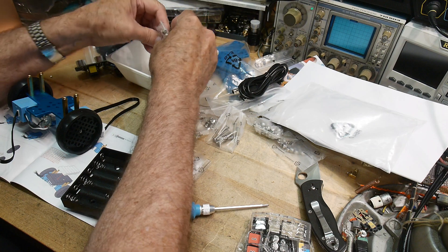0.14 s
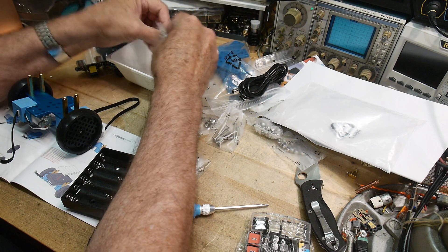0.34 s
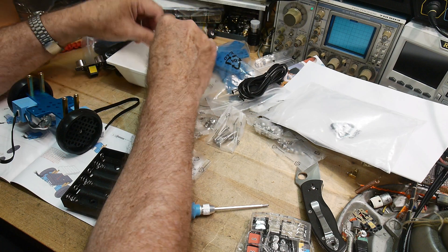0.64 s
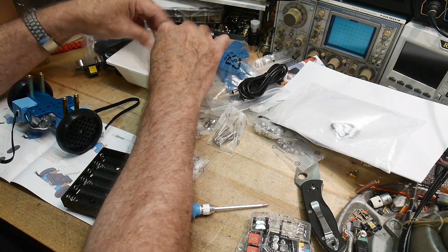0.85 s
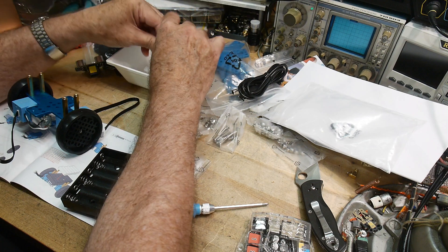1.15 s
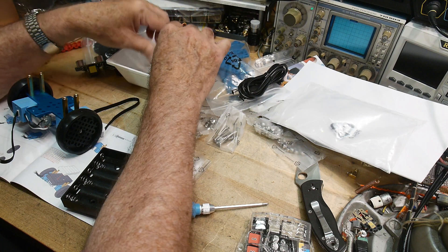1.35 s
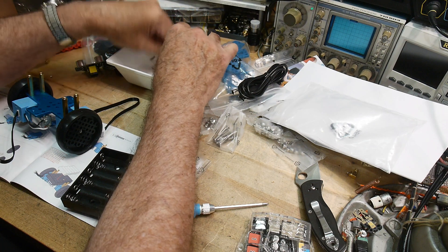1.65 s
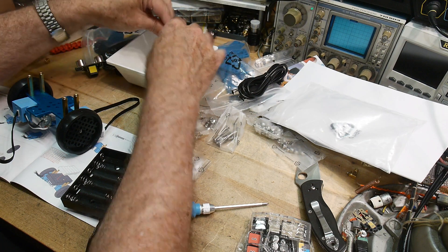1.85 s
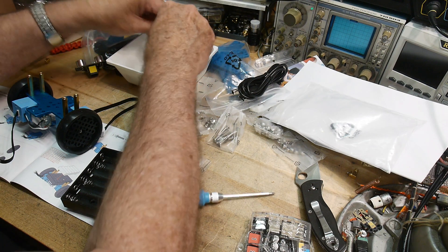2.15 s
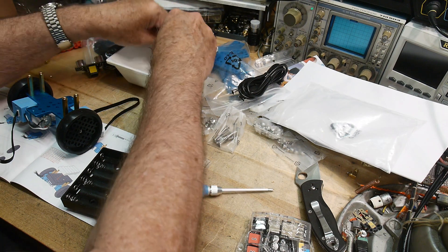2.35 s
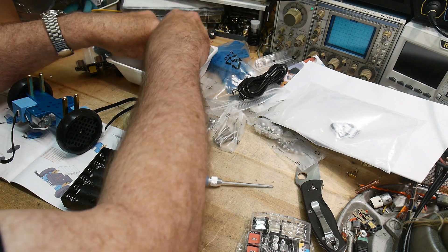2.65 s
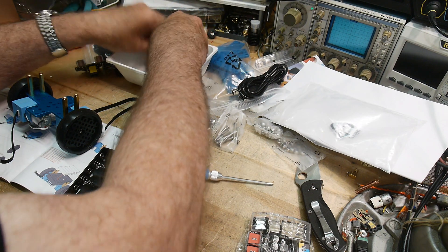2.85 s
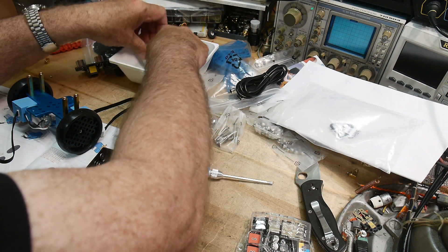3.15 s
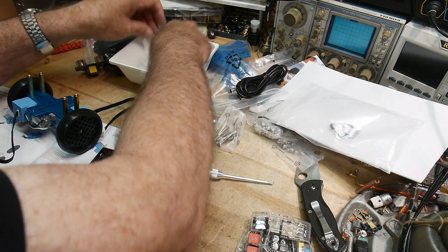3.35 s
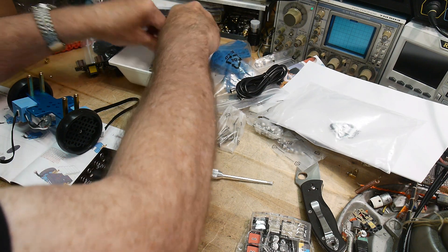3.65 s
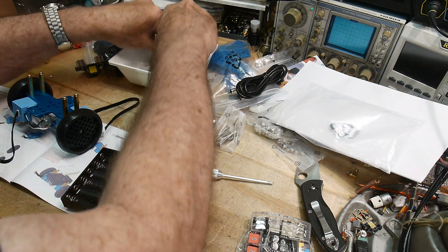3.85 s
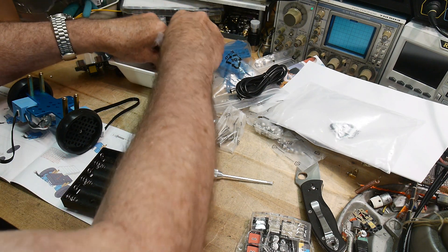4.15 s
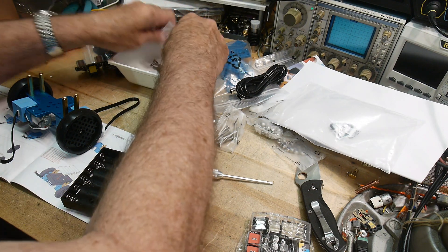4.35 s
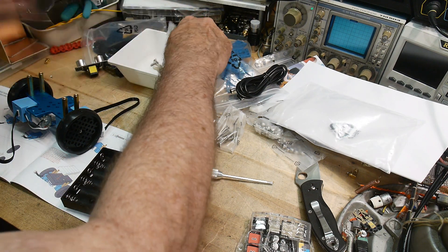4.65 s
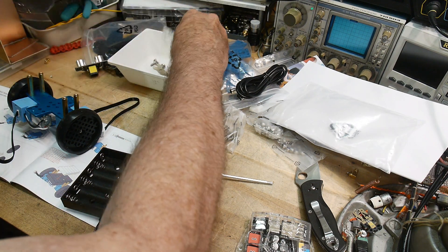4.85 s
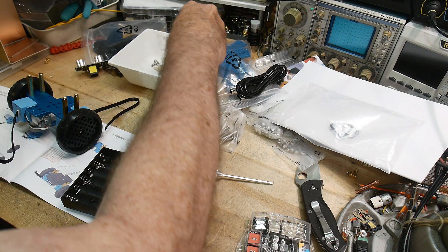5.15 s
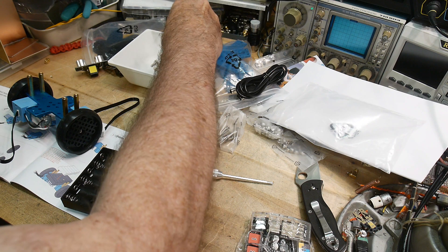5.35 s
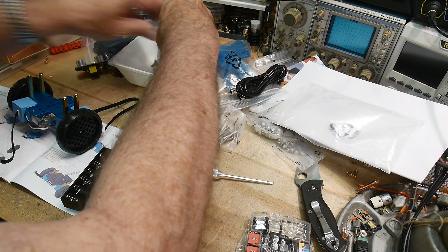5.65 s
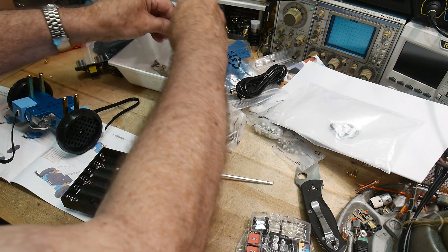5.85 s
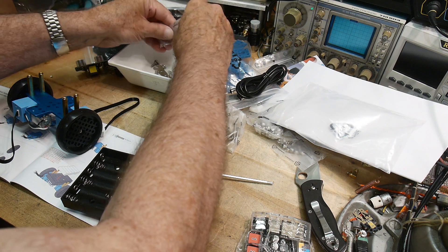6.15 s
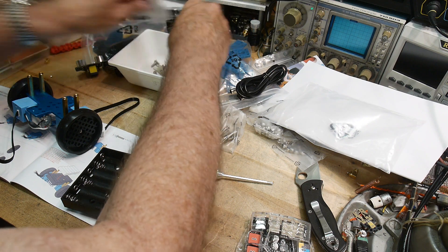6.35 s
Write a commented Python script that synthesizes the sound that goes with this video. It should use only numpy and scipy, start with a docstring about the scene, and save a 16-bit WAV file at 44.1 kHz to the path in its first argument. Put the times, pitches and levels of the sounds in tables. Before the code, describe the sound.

Small metal screws clatter and clink into a hard plastic tray in uneven bursts, while a thin plastic bag crackles between the fingers.

```python
"""Steel screws shaken into a plastic tray

Small screws drop from crackling plastic bags into a tray on a wooden workbench: modal impacts with noise cracks.
They ping and clink as decaying sines; the heap slides in shoves and loose screws roll, as random contacts
exciting tray modes. Filtered noise bursts make the bag's creases and the bumps and strokes of hands.
Hard knocks set single tray modes ringing. A short room tail and faint noise lie behind the almost mono sound,
whose loudest peaks are rounded off."""
import sys
import numpy as np
from scipy import signal
from scipy.fft import rfft, irfft, next_fast_len
from scipy.io import wavfile
from scipy.ndimage import uniform_filter1d, map_coordinates

SR = 44100
rng = np.random.default_rng(int(sys.argv[2]) if len(sys.argv) > 2 else 0)


def output_pcm(signal):
    """Save a mono or channel-first signal as 16-bit PCM at the path in sys.argv[1].

    Samples are clipped to [-1, 1] before scaling.
    """
    pcm = np.clip(np.atleast_2d(signal).T, -1, 1) * 32767
    wavfile.write(sys.argv[1], SR, np.round(pcm).astype(np.int16))


N = 286463
T = np.arange(SR // 2) / SR  # time axis of one sound, s
TOP_HZ = 16100  # upper band edge


# Spectrum of the hard crack at contact: f/Hz, level/dB
CLACK_COLOUR = [(60, -43), (500, -13.5), (800, 19.5), (2200, -9.5), (4000, 6.5), (7500, 14), (10000, 4.5),
                (12500, -1.5), (16000, -25.5)]
# Screws landing in the tray: t/s, hit level/dB, tray body level/dB relative to the hit,
# favoured f/Hz of the spot, base decay t60/s (scaled for each band below)
DROPS = [(0.533, -9.5, -27, 1720, 0.026), (0.553, -5.5, -9, 1640, 0.055), (0.575, -4.5, -1, 900, 0.042),
         (0.587, -5, -32, 800, 0.055), (0.622, -24, -27.5, 1760, 0.013), (0.637, 0.5, -29, 795, 0.0096),
         (0.651, -6, -13, 760, 0.054), (0.668, -6.5, -10.5, 754, 0.026), (0.702, -10.5, -4.5, 840, 0.0028),
         (0.709, -7.5, -43, 1660, 0.16), (0.906, 3.5, -13, 1584, 0.013), (0.958, -7, -10.5, 1520, 0.076),
         (1.013, -5, -12.5, 4900, 0.024), (1.034, -10.5, -13.5, 870, 0.044),
         (1.076, -16.5, -0.5, 805, 0.036), (1.088, 0.5, -13.5, 1800, 0.025), (1.091, -17, 2.5, 800, 0.095),
         (1.13, -25, 7, 837, 0.045), (1.574, -21, -1, 900, 0.027), (1.583, -16.5, 6, 764, 0.011),
         (1.613, -14.5, -6, 2000, 0.047), (1.638, -6.5, -5, 860, 0.036), (1.663, -7, -28, 1730, 0.02),
         (1.698, -3.5, -14, 1110, 0.0054), (1.737, -2, -3, 1700, 0.02), (1.766, -6.5, -21, 1620, 0.027),
         (1.803, -16.5, -6.5, 960, 0.078), (2.005, -24, -0.5, 1100, 0.039), (2.051, -4, -7, 830, 0.022),
         (2.058, 2.5, -38, 13200, 0.026), (2.09, -9.5, -7, 940, 0.017), (2.204, -9, -14.5, 1160, 0.023),
         (2.526, -19, 5.5, 1000, 0.019), (2.568, -14.5, -4, 840, 0.066), (2.58, -8.5, -11, 1110, 0.044),
         (2.621, -13, -15, 1100, 0.03), (2.671, -8, -7, 765, 0.018), (2.688, -5.5, -3, 4100, 0.01),
         (2.764, -14.5, -6, 766, 0.048), (3.075, -22.5, 1.5, 960, 0.15), (3.130, -9.5, -5.5, 2310, 0.092),
         (3.24, -7.5, -13.5, 1140, 0.013), (3.371, -6.5, -5.5, 790, 0.0038),
         (3.699, -18.5, -8.5, 1430, 0.27), (4.04, -7.5, -17, 1550, 0.029), (4.058, -26, -12, 3970, 0.031),
         (4.08, -11.5, -19, 1100, 0.092), (4.174, -16, 1, 1270, 0.019), (4.228, -11.5, -10, 1180, 0.042),
         (4.444, -7.5, -14, 4300, 0.019), (4.451, -5, -19, 2130, 0.044), (5.802, 6.5, -17.5, 1740, 0.025),
         (5.908, -4, -16, 2650, 0.068), (5.913, -1.5, -18, 1430, 0.028), (5.949, -16, 0, 2730, 0.013),
         (6.13, 5.5, -19.5, 752, 0.039), (6.181, -14.5, -9.5, 910, 0.075), (6.245, -27, -9, 1070, 0.053)]


def drops(modes):
    """Modal impact: a short noise crack and damped tray modes, whose treble dies first while the tray rings on."""
    out = np.zeros(N)
    for s, db, body_db, pitch_hz, t60 in DROPS:
        body, edge = split(strike(modes, pitch_hz, favour=3.17), hz=2850)
        # each band falls quickly to a weaker ring
        body = body * (fade(T, 1.3 * t60) + amp(-10.0))
        edge = edge * (fade(T, 1.03 * t60) + amp(-12.5))
        crack = noise(CLACK_COLOUR, len(T)) * choke(T, 0.012)
        hit = amp(body_db - 1.5) * body + amp(-0.5) * edge + amp(-12.0) * crack
        onset = 1 - np.exp(-T / 0.0013)
        add(out, s, amp(db) * hit * onset)
    return split(out, hz=256)[1]


def strike(modes, pitch_hz, favour):
    """Modal participation: each spot on the tray wakes the modes with its own signs and strengths."""
    hz, rows = modes
    weights = amp(rng.normal(0, 4.2, len(hz))) * (1 + favour * hump(hz, pitch_hz, octaves=0.049))
    signs = rng.choice([-1, 1], len(hz))
    return (signs * unit(weights)) @ rows


# Strongest eigenmodes of the tray: f/Hz, level/dB before the common strong_db
TRAY = [(438.3, -6), (795.7, 1), (868, 5), (953, 6), (1116, 7), (1387, 3), (1604, -7), (1723, 9),
        (1810, -0.5), (1999, 6), (2340, -25), (2450, -4.5), (2748, 1.5), (2870, -2.5), (3110, -6),
        (3625, 0.5), (3960, 2), (4750, -5), (4990, -1)]
# Envelope of the tray's many weak modes: f/Hz, level/dB
TRAY_COLOUR = [(200, -74), (550, -5.5), (800, 5.5), (1300, 2.5), (2200, 4.5), (3000, -5), (4000, -5),
               (5500, -9), (7800, -11), (10000, -11.5), (12000, -42), (16000, -12)]


def tray_modes(count, t60, damping, strong_db, uneven_db):
    """Modal superposition: a few strong decaying modes among many weak ones; damping rises with frequency."""
    weak_hz = 300 + (np.arange(count) + rng.random(count)) * (TOP_HZ - 300) / count
    weak_db = along(TRAY_COLOUR, weak_hz) + uneven_db * rng.uniform(-1, 1, count)
    main_hz, main_db = np.transpose(TRAY)
    hz = np.r_[main_hz, weak_hz]
    size = amp(np.r_[main_db + strong_db, weak_db])
    mode_t60 = t60 * (hz[:, None] / hz[1]) ** -damping  # t60 holds at the second strong mode
    rows = np.sin(2 * np.pi * hz[:, None] * T) * fade(T, mode_t60)
    return hz, size[:, None] / np.linalg.norm(size) * rows


# Spectral colour of the screws' scratch on the tray: f/Hz, level/dB
SCRATCH_COLOUR = [(1000, 13), (5000, 0.75), (9000, 11.4), (16000, 0.77)]


def rolling(modes):
    """Random contact excitation: threads and heads patter on the tray floor, wandering from spot to spot."""
    rumble_gain, scratch_gain = screw_motion()
    # a gently rolling screw makes a smooth, dull whirr; a shaken heap makes hard, bright ticks
    hardness = np.clip(1.04 * scratch_gain / rumble_gain.clip(1e-6), 0, 1) ** 2
    ticks = hardness * contacts(rate=140, spread_db=5.2)
    whirr = amp(-11.5) * contacts(rate=1300, spread_db=2)
    rumble, scratch = split(unit(wandering(modes, ticks + whirr, count=130)), hz=3050)
    rumble = split(rumble, hz=8200)[0]
    scratch = filtered(scratch, lambda hz: amp(along(SCRATCH_COLOUR, hz)))
    soft, sharp = split(steady(scratch), hz=7300)
    soft = split(soft, hz=10850)[0]
    low = amp(-4.0) * rumble_gain * steady(rumble)
    high = amp(1.2) * scratch_gain * (soft + hardness * sharp)
    clumps = unit(amp(3 * hardness * wobble(150)))  # harder motion has a more uneven level
    clinks = clinking(hardness * scratch_gain, count=650)
    return split(clumps * (low + high) + clinks, hz=196)[1]


# Shoves of the heap: peak t/s, rumble level/dB before mixing, rise over 60 dB t/s, settling t60/s,
# scratch level/dB relative to the rumble
SHOVES = [(.58, -29.5, 0.36, 1.4, -1), (1.091, -37, 0.081, 0.76, 0), (1.44, -27, 0.68, 0.12, -6.5),
          (1.634, -18, 0.13, 0.24, -2), (1.779, -25, 0.21, 0.23, -3.5), (2.071, -27, 0.035, 0.29, -2.5),
          (2.249, -26.5, 0.29, 0.52, -4.5), (2.587, -20, 0.13, 0.055, -3.5), (2.599, -24, 0.37, 0.97, -4),
          (2.68, -31, 0.32, 0.96, -5), (3.133, -15.5, 0.08, 0.078, -3.5), (3.138, -24.5, 0.13, 1.1, -4),
          (3.225, -25, 0.17, 0.1, -1), (3.56, -24, 0.27, 0.13, -4.5), (3.707, -34, 0.041, 0.1, -5),
          (4.045, -28.5, 0.14, 0.49, 2.5), (4.18, -27.5, 0.26, 0.46, -6.5), (4.308, -27, 0.29, 0.19, -4.5),
          (4.463, -34, 0.15, 0.2, 1), (4.815, -35, 0.11, 0.22, -4.5), (5.236, -25.5, 0.092, 0.084, -9),
          (5.95, -42.5, 0.33, 0.43, 4)]
# Loose screws rolling until stopped: start t/s, end t/s, rumble level/dB before mixing
ROLLS = [(0.902, 1.448, -38.5), (2.124, 2.506, -40), (2.803, 2.894, -32.5), (3.007, 3.097, -37),
         (3.34, 3.488, -29.5), (3.613, 3.685, -39), (3.959, 4.037, -36), (4.463, 4.757, -46),
         (5.827, 6.101, -41), (6.16, 6.281, -40)]
ROLL_START_S, ROLL_STOP_T60 = 0.003, 0.16  # onset time constant and stopping t60, s
ROLL_SCRATCH_DB = -7  # rolling is duller than sliding: scratch relative to the rumble


def screw_motion():
    """Incoherent power addition: rumble and scratch gains of the sliding heap and the rolling screws."""
    heap = [swell(s, db, rise, t60) for s, db, rise, t60, _ in SHOVES]
    heap_scratch = [gain * amp(row[-1]) for gain, row in zip(heap, SHOVES)]
    loose = together([hold(*row, ROLL_START_S, ROLL_STOP_T60) for row in ROLLS])
    rumble_gain = together(heap + [loose])
    scratch_gain = together(heap_scratch + [amp(ROLL_SCRATCH_DB) * loose])
    return rumble_gain, scratch_gain


def wandering(modes, force, count):
    """Convolution with a moving impulse response: the shifting load retunes the tray at each of count spots."""
    out = np.zeros(N)
    t = T[:len(T) // 3]
    for span in np.array_split(np.arange(N), count):
        touch = strike(modes, rng.uniform(730, 1503), favour=1.56)
        retune = 1 + .025 * rng.uniform(-1, 1)
        touch = map_coordinates(touch[:len(T) // 2], [t * SR * retune])
        response = unit(touch * (fade(t, .022) + amp(-15)))
        add(out, span[0] / SR, signal.fftconvolve(force[span], response))
    return out


# One screw glancing off another: t/s, peak level/dB, centre f/Hz
CLINKS = [(0.623, -25, 7400), (0.6524, -15, 7500), (0.69, -24, 7740), (0.711, -19, 7450),
          (0.729, -18, 7000), (0.76, -17, 7600), (0.771, -20, 8000), (1.699, -7.5, 7400),
          (2.052, -9, 13400), (2.058, -8, 12700), (2.2052, -17, 7450), (2.238, -19, 5500),
          (2.258, -18, 7430), (2.286, -21.5, 5740), (2.296, -20, 6700), (2.3241, -24, 5930),
          (2.586, -9.5, 6760), (2.627, -20, 6000), (2.655, -21, 9000), (2.7713, -20, 8000),
          (2.805, -22, 7100), (3.018, -24.5, 7800), (3.1886, -17, 6940), (3.2405, -10, 6720),
          (3.3253, -25.5, 6100), (3.4367, -17, 8350), (3.507, -25.5, 7100), (3.659, -27.5, 9400),
          (3.6877, -28, 5000), (4.041, -14.5, 8850), (4.088, -27, 8900), (4.122, -22, 9100)]
JOSTLE_DB, JOSTLE_SPREAD_DB = 7, 10  # small clinks: weakest peak over the motion gain, range up to the strongest
CLINK_T60 = 0.017  # decay of any clink, s


def clinking(motion, count):
    """Random superposition: a few clear clinks, and a crowd of small ones while the heap moves."""
    out = np.zeros(N)
    for s, db, hz in CLINKS:
        add(out, s, amp(db) * clink(hz))
    for when, size, pitch in rng.random((count, 3)):
        level = motion[int(when * N)] * amp(JOSTLE_DB + JOSTLE_SPREAD_DB * size ** 2)
        add(out, when * N / SR, level * clink(4000 * 2 ** pitch))
    return out


def clink(pitch_hz):
    """Inharmonic additive synthesis: a wide cluster of quickly damped steel partials; peak 1."""
    t = T[:len(T) // 12]
    detune, phase = rng.standard_normal(size=(2, 32, 1))
    hz = pitch_hz * 2 ** (0.42 * detune)
    strength = (hz < TOP_HZ) * np.minimum(pitch_hz / hz, 1) ** 2
    partials = strength * np.sin(2 * np.pi * (hz * t + phase))
    sound = partials.sum(0) * fade(t, CLINK_T60)
    return sound / np.abs(sound).max()


def ringing():
    """Free vibration: struck screws and knocked tray modes sound on at their own frequencies."""
    return pings() + booms()


# Screws striking each other: t/s, level/dB of the first bending mode, its f/Hz
PINGS = [(.588, -19, 9150), (.637, -23.5, 7750), (.710, -31, 7820), (1.035, -41, 9900), (1.09, -40, 9900),
         (1.418, -33.5, 9560), (1.422, -32, 9850), (1.63, -28.5, 9960), (2.670, -28.5, 9800),
         (3.165, -37, 9900), (3.204, -30.5, 9880), (3.444, -37, 9900), (4.04, -46, 10200),
         (4.173, -31, 9900), (4.23, -32.5, 10000), (4.272, -49, 9600), (4.804, -45, 9900),
         (6.205, -39, 9350)]
# Higher bending modes of a screw: f/Hz, mean level/dB relative to the first
SCREW = [(13160, -14), (15800, -18)]
# Spectrum of the bright tick at contact: f/Hz, level/dB
TICK_COLOUR = [(3000, -59), (8000, 4), (10500, -5), (16000, -3)]
# tick over the hardest ping (dB), its extra growth (dB per dB of ping), its decay (s)
TICK_DB, TICK_GROWS, TICK_T60 = 12, 0.95, 0.029


def pings():
    """Bending modes of a bar: decaying sines behind a bright tick that grows faster than the ping."""
    out = np.zeros(N)
    hardest_db = max(row[1] for row in PINGS)

    def tone(hz, t60):
        return np.sin(2 * np.pi * hz * T) * fade(T, t60)

    for s, db, first_hz in PINGS:
        upper = sum(amp(level + rng.normal(0, 2)) * tone(hz, t60=.16) for hz, level in SCREW)
        add(out, s, amp(db) * (tone(first_hz, t60=.2) + upper))
        tick_db = db + TICK_DB + TICK_GROWS * (db - hardest_db)
        add(out, s, amp(tick_db) * noise(TICK_COLOUR, len(T)) * fade(T, TICK_T60))
    return out


# Single tray modes after a hard scrape or knock: t/s, f/Hz, level/dB, t/s until 60 dB down
BOOMS = [(0.532, 1725, -24, 0.13), (.555, 1705, -20, 0.2), (.578, 422, -25.5, 0.27),
         (.578, 790, -18.5, 0.32), (.578, 1420, -28, 0.045), (1.09, 794, -26, 0.099),
         (1.615, 870, -20, 0.073), (2.052, 870, -25, 0.053), (3.533, 800, -17.5, 0.049),
         (4.303, 916, -28, 0.07), (6.131, 795, -4.5, 0.012)]
# loose screws buzz on the ringing tray: phase scale (radians), level scale, random knots per second
BOOM_ROUGH, BOOM_FLUTTER_DB, BUZZ_PER_S = .25, 1.3, 90


def booms():
    """Modulated modal decay: the tray sings out roughly until the heap damps it."""
    out = np.zeros(N)
    for s, hz, db, length in BOOMS:
        phase_buzz, level_buzz = wobble(BUZZ_PER_S)[:len(T)], wobble(BUZZ_PER_S)[:len(T)]
        note = np.sin(2 * np.pi * hz * T + BOOM_ROUGH * phase_buzz) * amp(BOOM_FLUTTER_DB * level_buzz)
        onset = 1 - np.exp(-T / 0.0021)
        add(out, s, amp(db) * note * choke(T, length) * onset)
    return out


# Loudest creases of the bag snapping over: t/s, level/dB (played 2 dB lower), centre f/Hz
SNAPS = [(0.017, -12, 4370), (0.057, -10.5, 5960), (3.96, -26, 6000), (0.0717, -13.5, 4040),
         (0.1445, -8, 6340), (0.1512, -7, 4200), (0.161, -7.5, 6500), (0.17, -10.5, 4030),
         (0.2074, -20, 6800), (0.265, -17, 6850), (0.359, -19.5, 7000), (0.371, -11, 4470),
         (0.405, -20.5, 7760), (0.4249, -8.5, 4320), (0.4426, -8.5, 6700), (0.489, -17, 4360),
         (0.817, -15, 5100), (0.875, -22, 6500), (0.854, -18.5, 5500), (1.371, -25, 6000),
         (1.8544, -19, 4600), (1.939, -24.5, 6000), (2.035, -15, 7250), (3.3764, -16, 3750),
         (3.427, -17, 7610), (3.4656, -13, 3800), (3.629, -18.5, 5900), (3.8, -8.5, 5860),
         (3.8682, -18, 6460), (3.8827, -15, 8500), (3.89, -19.5, 6400), (4.578, -23, 4660),
         (4.6702, -27, 8000), (4.6365, -11, 7460), (4.727, -20.5, 6500), (4.835, -19, 6500),
         (4.8432, -20.5, 7000), (4.853, -25, 7000), (4.872, -25, 6000), (4.932, -14, 8200),
         (4.9424, -17, 7050), (4.987, -22.5, 4000), (5.042, -22, 7800), (5.12, -23.5, 5400),
         (5.39, -24.5, 4550), (5.412, -20.5, 9400), (5.5973, -12, 9200), (5.675, -18, 7050),
         (5.6935, -13.5, 6600), (5.7715, -15, 3540), (6.105, -18.5, 7590)]
# The whole bag buckling: t/s, level/dB
BUCKLES = [(0.147, -22), (0.159, -22.5), (.397, -13.5), (0.407, -13.5), (0.415, -29), (0.426, -15),
           (0.488, -29), (3.8, -30), (5.76, -28.5)]
# Spectrum of a buckle: f/Hz, level/dB
BUCKLE_COLOUR = [(100, -62), (300, -19), (650, 7.5), (850, -3), (1080, 5.5), (1450, 1.5), (2000, -39),
                 (5000, -38)]
# The bag crumpled between the fingers: start t/s, end t/s, level/dB
CRUMPLES = [(.001, -0.003, -28.5), (0.122, 0.18, -41.5), (0.358, 0.385, -51), (0.394, 0.416, -22),
            (1.905, 2.024, -55), (3.35, 3.46, -36.5), (3.635, 3.687, -48), (3.78, 3.878, -37.5),
            (4.66, 4.73, -38), (4.8, 5.059, -45.5), (5.376, 5.684, -52.5), (5.754, 5.835, -35.5),
            (6.391, 6.443, -43.5)]
# the film gives way at once (time constant, s) and relaxes slowly (t60, s)
CRUMPLE_START_S, CRUMPLE_STOP_T60 = 0.00043, 0.14


def bag():
    """Snap-through instability: creases snap, the film buckles, and fine crackle fills the gaps."""
    out = np.zeros(N)
    t = T[:len(T) // 4]
    for s, db, pitch_hz in SNAPS:
        add(out, s, amp(db - 2.0) * snap(pitch_hz))
    # a buckle is a dull, hollow pop
    for s, db in BUCKLES:
        pop = fade(t, 0.046) * (1 - np.exp(-t / 0.00028))
        add(out, s, amp(db) * noise(BUCKLE_COLOUR, len(t)) * pop)
    crackle = np.zeros(N)
    for hz in (3900, 6100, 7200, 9200):
        crackle += unit(signal.fftconvolve(contacts(rate=180, spread_db=16), snap(hz))[:N])
    swish = noise(FILM_COLOUR, N)
    crumpling = together([hold(*row, CRUMPLE_START_S, CRUMPLE_STOP_T60) for row in CRUMPLES])
    return out + crumpling * unit(steady(crackle) + amp(-5.5) * swish)


# Spectrum radiated by the plastic film: f/Hz, level/dB
FILM_COLOUR = [(200, 0.5), (1000, 15), (2200, 0.5), (4200, 2), (5500, -0.5), (7500, 3.5), (10500, -2),
               (16000, -5.5)]


def snap(pitch_hz):
    """Impulsive radiation: a crease flips within milliseconds and the film shivers briefly; peak 1."""
    t = T[:len(T) // 8]
    film = filtered(rng.standard_normal(len(t)),
                    lambda hz: amp(along(FILM_COLOUR, hz)) * hump(hz, pitch_hz, octaves=0.56))
    flip = np.exp(-((t - .0009) / .0008) ** 2) + amp(-12) * fade(t, .012)
    shiver = amp(-10.5) * fade(t, 0.059)
    sound = film * (flip + shiver)
    return sound / np.abs(sound).max()


def hands():
    """Impact and friction: soft bumps on the bench and strokes over bag and tray."""
    return rubs() + bumps()


# Fingers stroking bag and tray: peak t/s, level/dB, rise over 60 dB t/s, fading t60/s
RUBS = [(.57, -23.5, 0.66, 0.66), (1.97, -38, 0.5, 1.2), (2.53, -44, 1.9, 2.9), (3.11, -33.5, 0.75, 1.2),
        (3.43, -37, 0.31, 2.2), (4.009, -32.5, 0.32, 1.1), (4.3, -41.5, 0.76, 1.7), (5.22, -38, 0.6, 0.23),
        (5.76, -53.5, 16, 0.38), (6.43, -52, 1.8, 2)]
# Spectrum of one slip: f/Hz, level/dB
RUB_COLOUR = [(70, -44), (130, -20), (260, -5.5), (430, 0.5), (560, 5.5), (800, 5), (1500, 1.5),
              (3000, -16), (10000, -18), (16000, -27)]
# the fingers press now harder, now lighter: level scale, random knots per second
RUB_UNEVEN_DB, RUB_CHANGES_PER_S = 2.5, 25


def rubs():
    """Stick-slip friction: random small slips, each a dull decaying noise burst."""
    slip = noise(RUB_COLOUR, len(T)) * fade(T, 0.045)
    rubbing = unit(signal.fftconvolve(contacts(rate=280, spread_db=9.0), slip)[:N])
    pressure = unit(amp(RUB_UNEVEN_DB * wobble(RUB_CHANGES_PER_S)))
    return together([swell(*row) for row in RUBS]) * rubbing * pressure


# Hands and tray bumping the bench: t/s, level/dB (played 4 dB lower), emphasised f/Hz
BUMPS = [(0.402, -18, 320), (0.532, -24.5, 217), (0.571, -13, 317), (0.584, -19, 366), (1.087, -35, 496),
         (2.234, -21, 736), (2.51, -17.5, 497), (3.076, -23.5, 408), (3.116, -18.5, 326), (3.354, -26, 545),
         (3.524, -22.5, 360), (3.546, -21.5, 450), (4.023, -26.5, 367), (4.294, -21.5, 370),
         (4.372, -31.5, 475), (4.401, -27, 393), (4.908, -33, 100), (5.221, -26.5, 317), (5.45, -39.5, 75),
         (6.129, -35.5, 190), (6.423, -34.5, 397)]
# Spectrum of the bench: f/Hz, level/dB
BUMP_COLOUR = [(40, -40), (80, -12), (125, 11), (200, -5), (290, 6.5), (350, -5), (430, 11.5), (560, -1.5),
               (650, 5.5), (1200, 7.5), (4000, -12)]


def bumps():
    """Damped impact response: low noise around one pitch, dying within a tenth of a second."""
    out = np.zeros(N)
    envelope = fade(T, 0.098) * (1 - np.exp(-T / 0.00046))
    for s, db, pitch_hz in BUMPS:
        wood = filtered(rng.standard_normal(len(T)),
                        lambda hz: amp(along(BUMP_COLOUR, hz)) * hump(hz, pitch_hz, octaves=0.91) ** 2)
        add(out, s, amp(db - 4.0) * unit(wood) * envelope)
    return out


def workshop(x, t60):
    """Diffuse reverberation: the short, soft answer of a cluttered room."""
    colour = [(200, -2.0), (2500, 11.0), (8000, 1.0), (16000, 11.0)]  # f/Hz, level/dB
    tail = noise(colour, len(T)) * fade(T, t60) * (1 - np.exp(-T / 0.0029))
    return signal.fftconvolve(x, tail / np.linalg.norm(tail))[:N]


# Spectrum of the background: f/Hz, level/dB
ROOM_COLOUR = [(15, -13), (30, 3), (50, -7.5), (120, -6.5), (400, -10), (800, -7), (1500, -29),
               (3000, -20.5), (8000, -21.5), (16000, -32)]


def background():
    """Stationary noise: a faint, mostly low hush under everything."""
    return amp(-56) * noise(ROOM_COLOUR, N)


def amp(db):
    """Level definition: decibels to amplitude ratio."""
    return 10 ** (np.asarray(db) / 20)


def unit(x):
    """Power normalisation: x at rms 1."""
    return x / np.sqrt(np.mean(x ** 2) + 1e-20)


def along(points, hz):
    """Logarithmic frequency scale: (Hz, value) points interpolated on a log axis."""
    f, v = np.transpose(points)
    return np.interp(np.log(hz + 1), np.log(f + 1), v)


def wobble(rate):
    """Band-limited randomness: a smooth random curve, rate knots a second."""
    knots = rng.standard_normal(int(N * rate / SR) + 4)
    return map_coordinates(knots, [np.arange(N) * rate / SR])


def filtered(x, response):
    """Linear filtering: the spectrum of x times a response of frequency."""
    n = x.shape[-1]
    m = next_fast_len(n + 4096)
    return irfft(rfft(x, m) * response(np.fft.rfftfreq(m, 1 / SR)), m)[..., :n]


def noise(colour, size):
    """Spectral shaping: coloured noise of rms 1."""
    return unit(filtered(rng.standard_normal(size), lambda hz: amp(along(colour, hz))))


def split(x, hz):
    """Crossover filtering: the parts of x below and above hz."""
    parts = []
    for kind in ("low", "high"):
        stage = signal.butter(2, hz, kind, fs=SR, output="sos")
        parts.append(signal.sosfilt(np.tile(stage, (2, 1)), x))  # two equal stages
    return parts


def hump(hz, centre, octaves):
    """Resonance curve: an emphasis around one pitch."""
    return 1 / np.hypot(1, np.log2((hz + 1) / centre) / octaves)


def fade(t, t60):
    """Exponential decay: 60 dB down after t60."""
    return np.exp(-np.log(1000) * t / np.maximum(t60, 1e-4))


def choke(t, length):
    """Growing damping: a decay that lingers, then falls ever faster, 60 dB down after length."""
    return fade(t * t / length, length)


def swell(s, db, rise, t60):
    """Exponential growth and decay: gain of a push that builds to its peak at time s and dies away."""
    t = np.arange(N) / SR - s
    return amp(db) * fade(np.abs(t), np.where(t < 0, rise, t60))


def hold(start, end, db, attack, t60):
    """Onset, steady state and decay: gain of a motion that starts, keeps its strength and stops."""
    t = np.maximum(np.arange(N) / SR - start, 0)
    after = np.maximum(t - (end - start), 0)
    return amp(db) * (1 - np.exp(-t / attack)) * fade(after, t60)


def together(gains):
    """Incoherent summation: unrelated sounds add in power."""
    return np.sqrt(np.sum(np.square(gains), axis=0))


def steady(x):
    """Short-time level control: x near rms 1 over some 40 ms; the grain stays, slow swells go."""
    power = np.abs(uniform_filter1d(uniform_filter1d(x ** 2, size=SR // 25), size=SR // 50))
    return x / np.sqrt(power + 1e-9)


def contacts(rate, spread_db):
    """Random point process: tiny impulses of uneven size, about rate a second, rms 1."""
    sizes = rng.choice([-1, 1], N) * amp(spread_db * np.minimum(rng.standard_normal(N), 2))
    return unit(sizes * (rng.random(N) < rate / SR))


def add(track, s, sound):
    """Linear superposition: mix a sound into the track at time s."""
    start = max(round(s * SR), 0)
    part = track[start:start + len(sound)]
    part += sound[:len(part)]


def scene():
    """Superposition: direct sources, room tail and background, one channel slightly louder."""
    modes = tray_modes(count=230, t60=0.2, damping=0.36, strong_db=3.0, uneven_db=5.0)
    near = drops(modes) + rolling(modes) + ringing() + bag() + hands()
    mono = near + amp(-13.0) * workshop(near, t60=0.18) + background()
    return mono * amp([[.7], [-.7]])


def record(dry):
    """Soft saturation and band limiting: the highest peaks are rounded off, and the band ends steeply."""
    rounded = dry / (1 + np.abs(dry.mean(0) / .57) ** 4) ** (1 / 4)
    return filtered(rounded, lambda hz: 1 / (1 + (hz / TOP_HZ) ** 120))


dry = scene()
out = record(dry)
output_pcm(out)
```